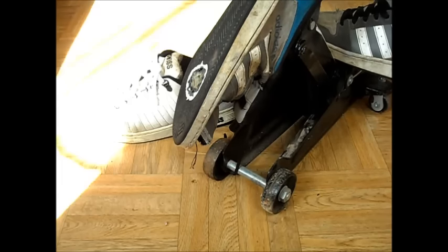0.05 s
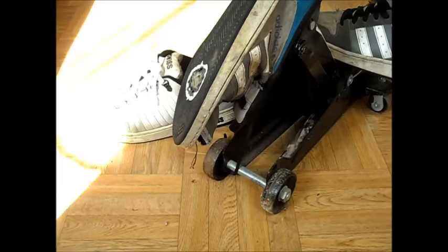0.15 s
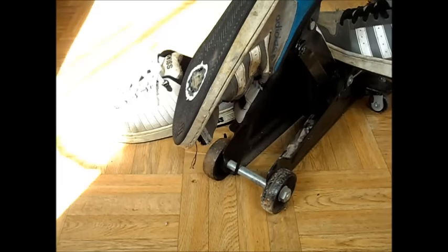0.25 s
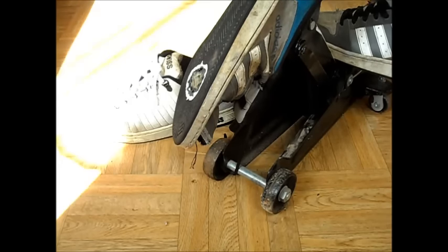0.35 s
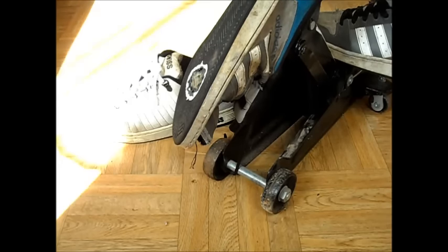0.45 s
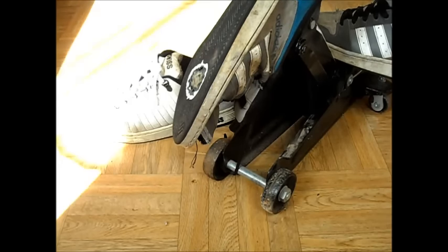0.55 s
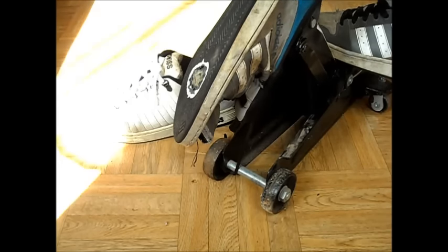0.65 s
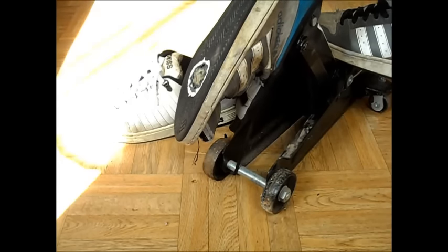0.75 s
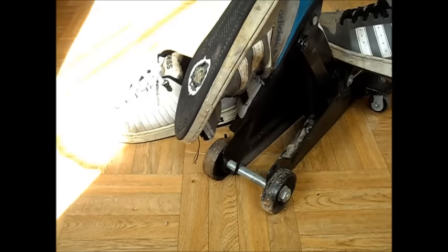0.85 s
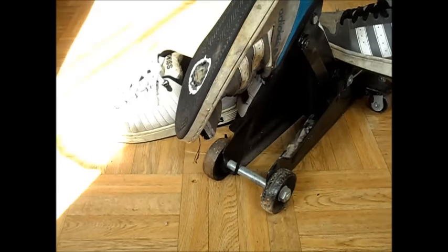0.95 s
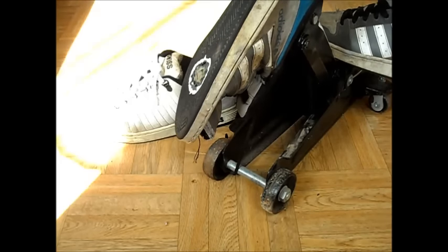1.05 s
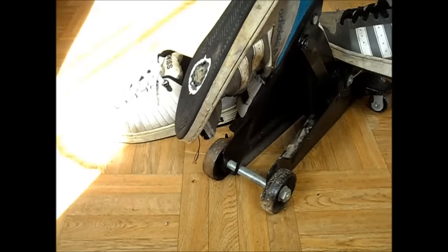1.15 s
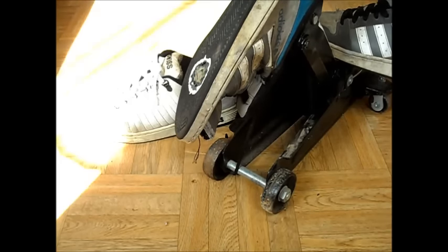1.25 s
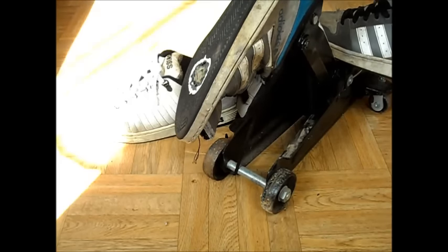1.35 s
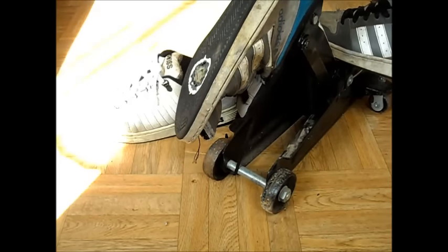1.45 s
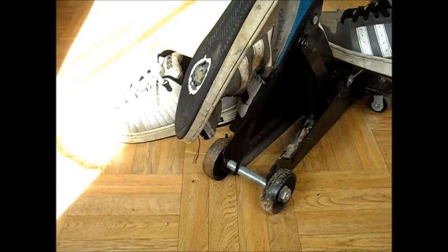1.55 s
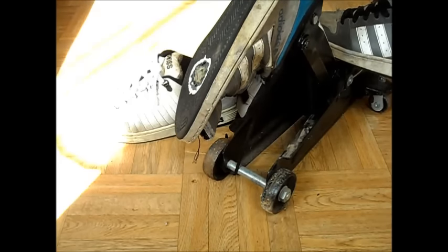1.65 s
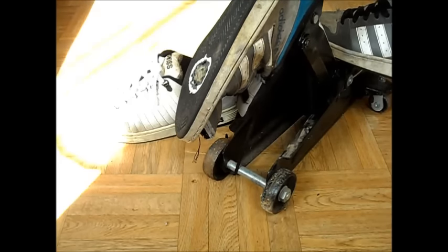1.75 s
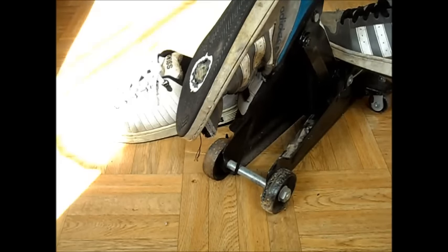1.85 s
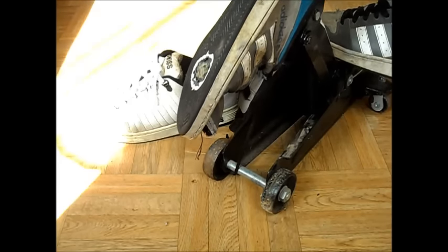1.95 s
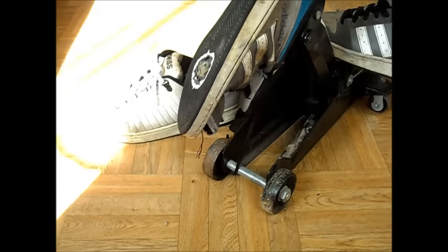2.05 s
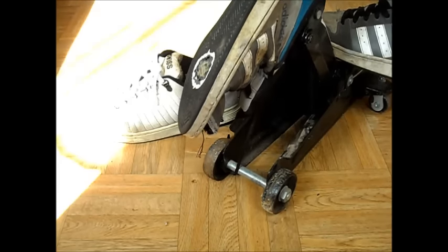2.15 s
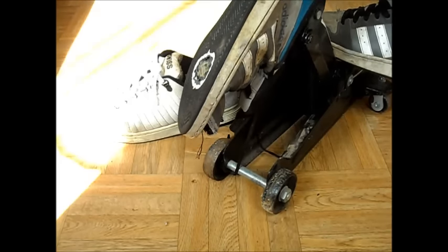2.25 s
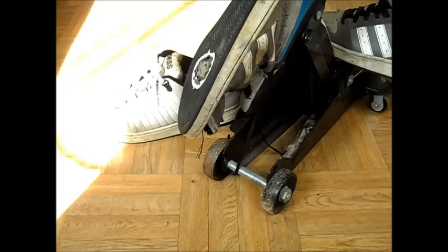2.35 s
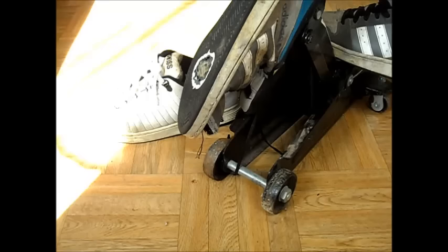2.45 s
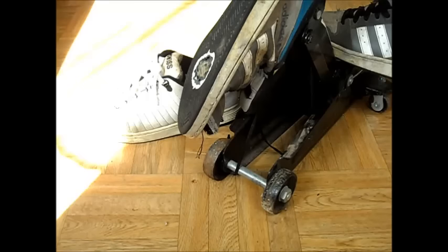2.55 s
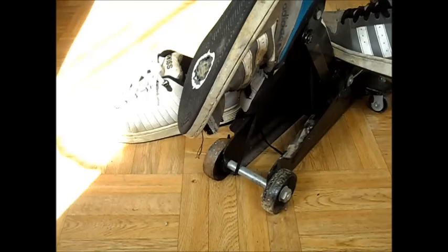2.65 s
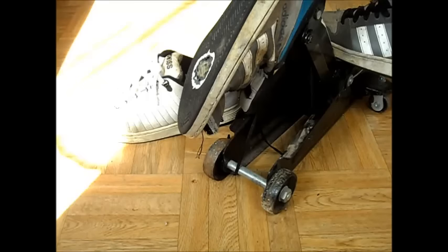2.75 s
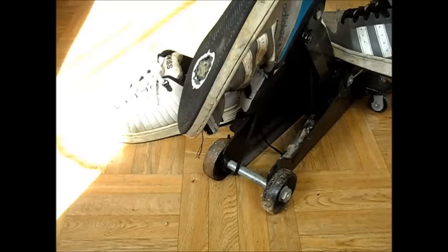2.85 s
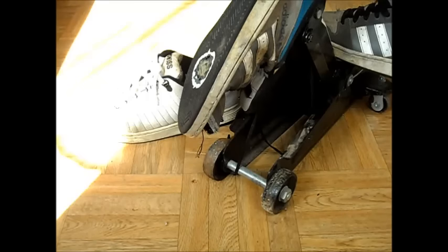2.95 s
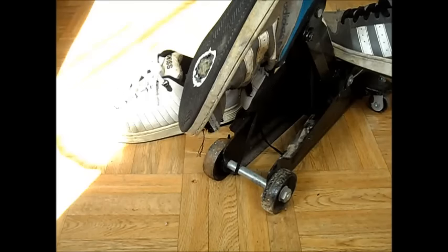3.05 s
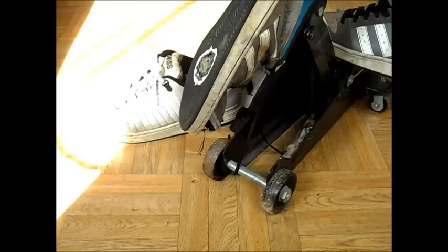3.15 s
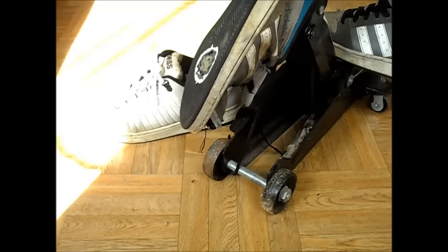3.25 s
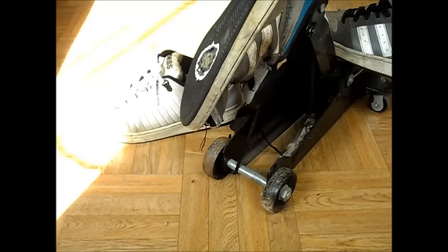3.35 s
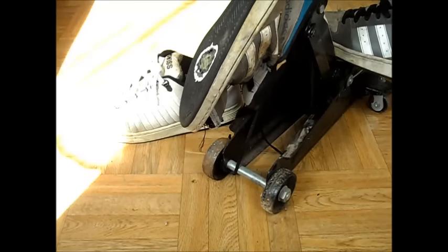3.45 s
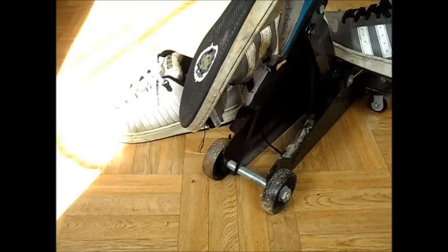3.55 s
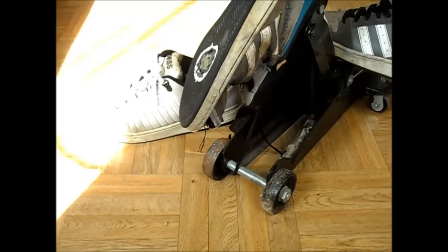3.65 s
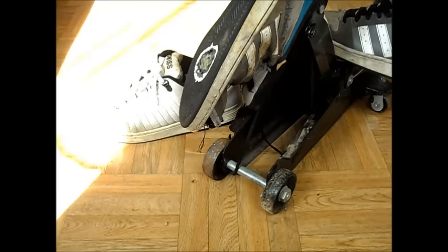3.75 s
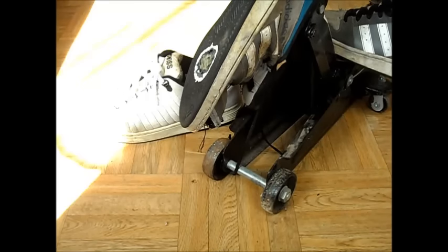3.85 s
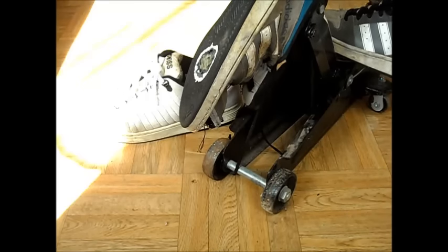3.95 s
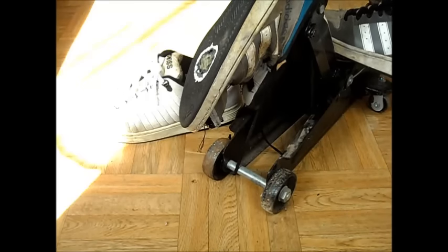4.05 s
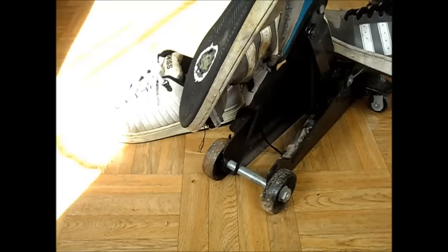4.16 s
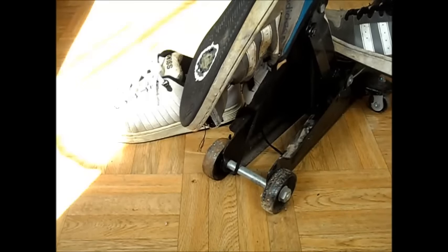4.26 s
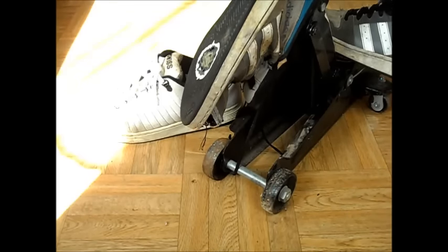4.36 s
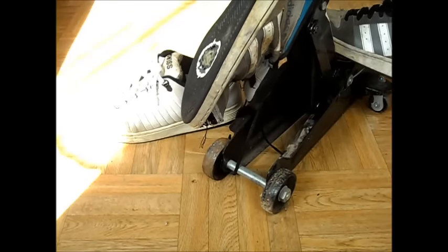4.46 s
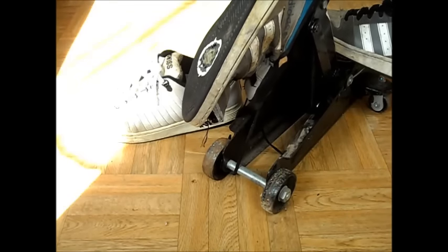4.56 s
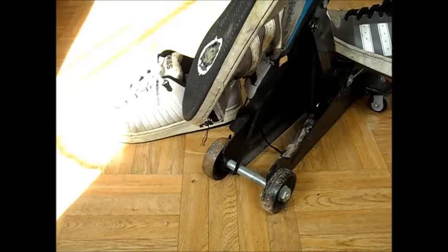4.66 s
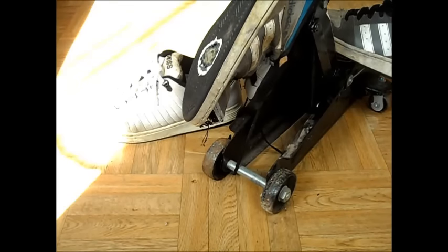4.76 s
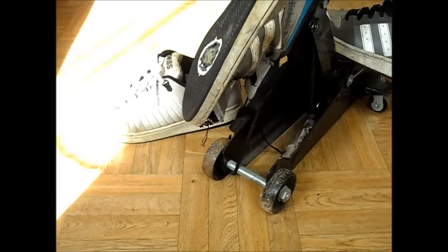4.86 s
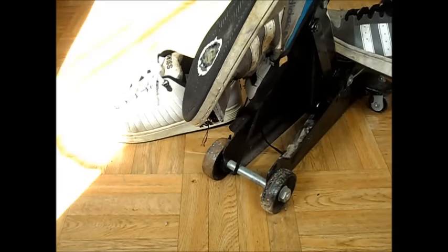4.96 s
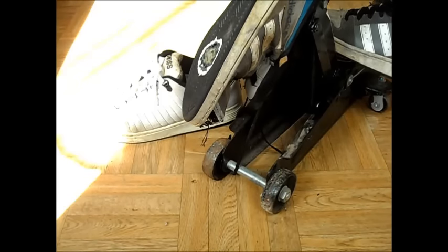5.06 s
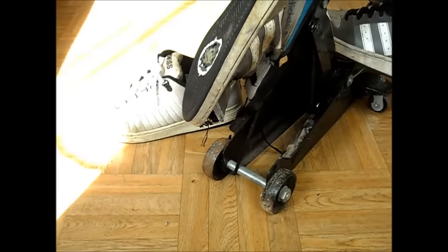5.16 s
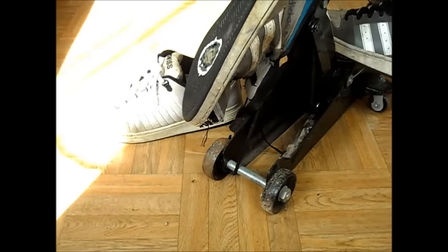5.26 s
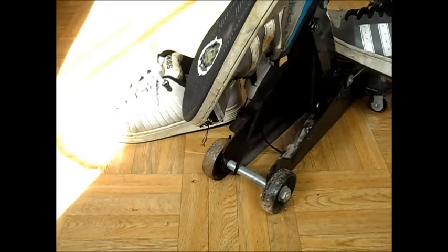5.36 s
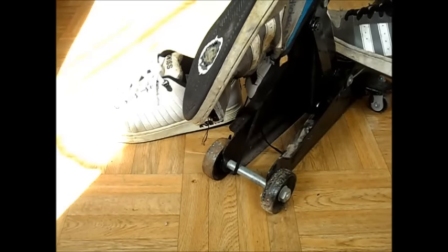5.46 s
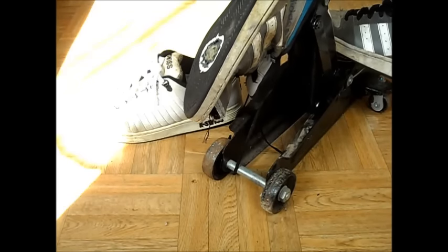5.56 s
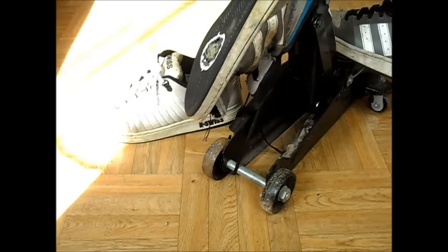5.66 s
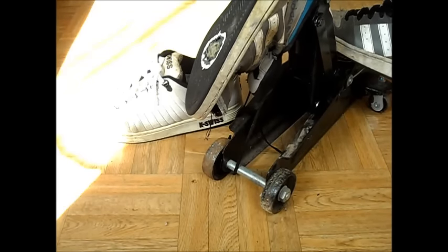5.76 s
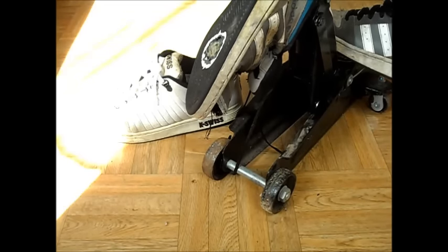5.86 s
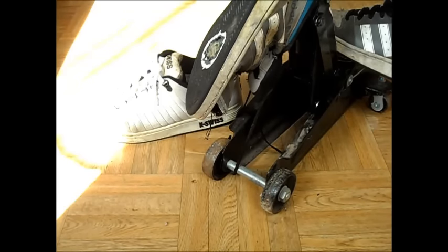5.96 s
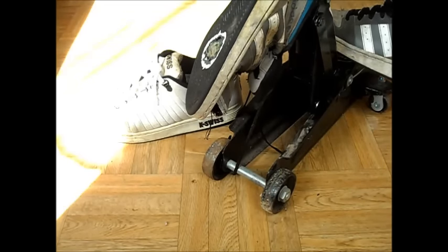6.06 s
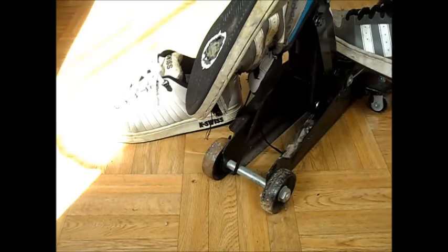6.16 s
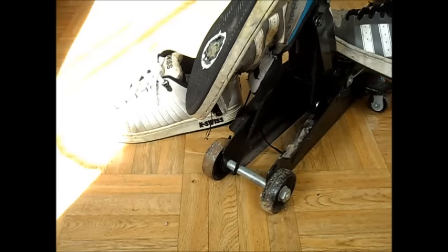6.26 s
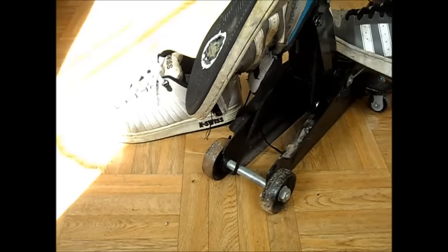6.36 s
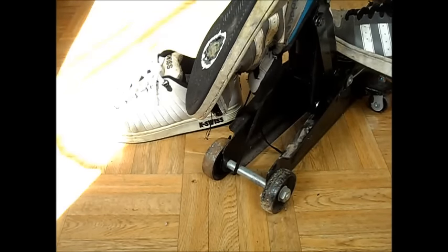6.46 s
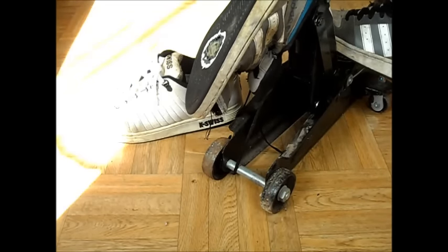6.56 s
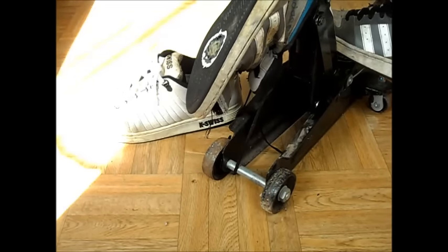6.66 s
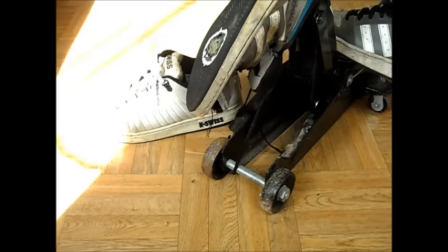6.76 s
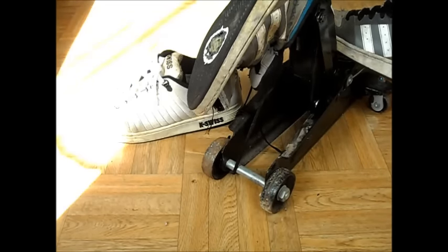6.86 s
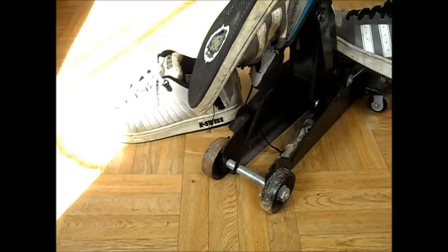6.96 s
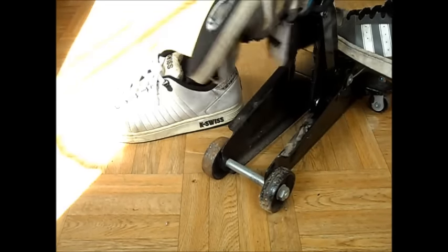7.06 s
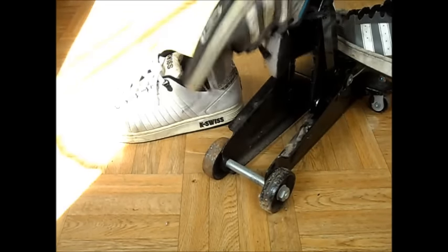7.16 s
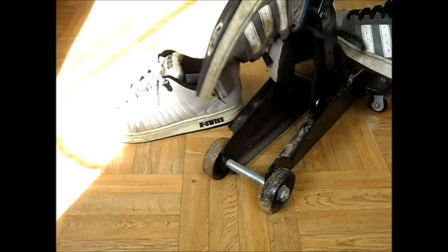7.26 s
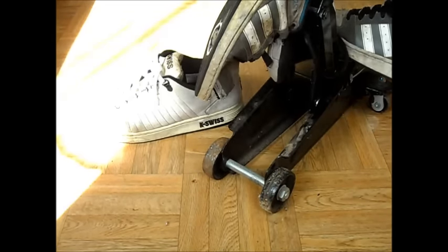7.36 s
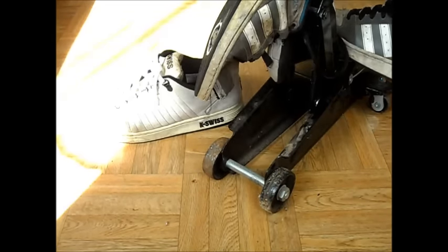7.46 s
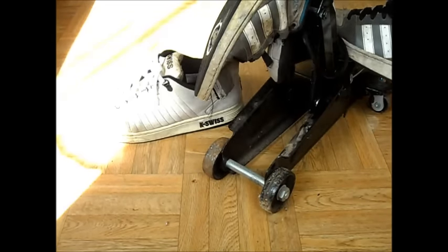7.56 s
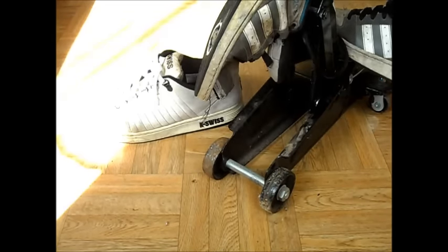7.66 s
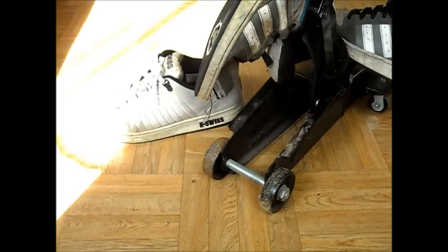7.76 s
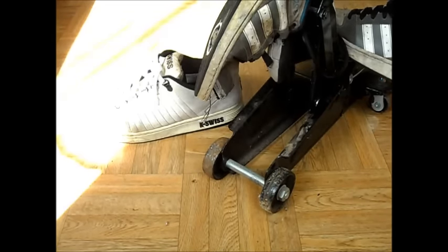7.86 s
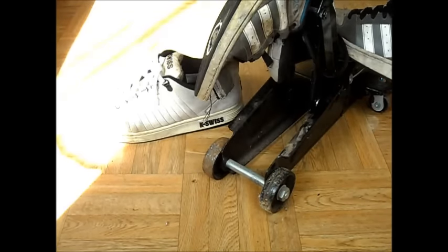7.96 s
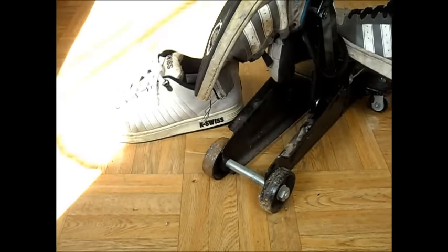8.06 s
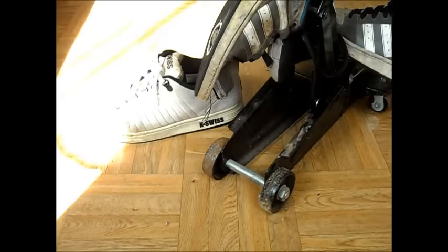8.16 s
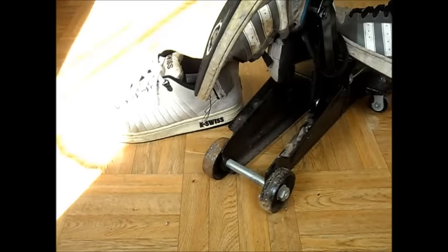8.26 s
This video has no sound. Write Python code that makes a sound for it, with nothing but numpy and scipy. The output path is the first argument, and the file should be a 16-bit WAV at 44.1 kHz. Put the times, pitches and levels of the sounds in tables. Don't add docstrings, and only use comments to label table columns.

```python
import sys
import numpy as np
from scipy import signal
from scipy.fft import rfft, irfft
from scipy.io import wavfile
from scipy.ndimage import uniform_filter1d

SR = 44100
rng = np.random.default_rng(int(sys.argv[2]) if len(sys.argv) > 2 else 0)


def invert_db(level):
    return 10 ** (np.asarray(level, dtype=float) / 20)


def int16_out(signal):
    q = np.round(np.clip(np.atleast_2d(signal).T, -1, 1) * 32767)
    wavfile.write(sys.argv[1], SR, q.astype(np.int16))


N = 366010

# pitch_hz, level_db [dB per Hz]
HISS_SPECTRUM = [(25, -2.5), (81, -1.5), (127, 0.5), (196, -8), (490, -9.5), (1620, -15.5), (9600, -22),
                 (10900, -30.5)]
HISS_LEVEL_DB = -61.5
# pitch_hz, decay_s [to -60 dB]
ROOM_DECAY = [(60, 0.97), (250, 0.27), (1000, 0.48), (3000, 0.53), (6000, 0.41), (10000, 0.4)]
# pitch_hz, level_db
CASING_COLOUR = [(200, -2.5), (700, 0.06), (1200, 1), (2000, 6), (3200, 3.5), (5000, 3.5), (7500, 5.5),
                 (10000, -2.5)]

# pitch_hz, level_db, decay_s [to -60 dB]
BOARD_MODES = [(75.5, 0, .4), (103, 0, .4), (146, 0, .3), (188, -3, .25)]
FRAME_MODES = [(253.5, 1, 0.13), (267.8, -20, 0.034), (314.9, 4.5, 0.16), (329, -6.5, 0.047),
               (373.3, 7.5, 0.15), (432.3, 5.5, 0.11), (455.5, -11, 0.021), (535.3, -6.5, 0.22),
               (636, 0, 0.082), (776, -7, 0.014)]
STEEL_MODES = [(850, -1.5, 0.011), (1083, -1.5, 0.018), (1201, -1, 0.027), (1328, -4.5, 0.026),
               (1500, -8, 0.012), (1798, -3, .008), (2000, -1, .012), (2254, -1, 0.011),
               (2500, -4.5, 0.0076), (2900, -8, 0.011), (3300, -11, 0.0027)]
PIN_MODES = [(3700, -2, .003), (4300, -2, .003), (4900, -3, .003), (5450, -3, .007), (6100, -2, .004),
             (6900, -3, .0025), (7800, -4, .004), (8900, -6, .002)]

# start_s, level_db, pitch_hz [favoured by the
FLOOR_PUSHES = [(.566, -37, 77), (1.054, -32, 86.5), (1.153, -40.5, 92), (1.746, -37, 109),
                (1.777, -31.5, 89.5), (1.78, -35.5, 147), (2.205, -30, 90), (2.296, -36.5, 90),
                (3.460, -28.5, 78), (3.55, -41, 71), (3.660, -36, 110), (3.738, -38, 84), (3.809, -41, 94),
                (4.276, -30.5, 96), (4.747, -38, 89), (4.789, -36.5, 81.5), (4.994, -46, 157),
                (5.294, -38.5, 97), (5.439, -41.5, 120), (5.988, -39, 72), (6.581, -36.5, 117),
                (7.041, -18.5, 86), (7.071, -11.5, 90),
                (0.023, -44.5, 103), (.13, -49, 108), (0.247, -47, 82.5), (.436, -45.5, 124),
                (.62, -44.5, 150), (.798, -54, 149), (1.312, -41, 90), (1.377, -45.5, 110),
                (2.472, -47.5, 80.6), (2.826, -43.5, 89), (2.964, -37, 78), (3.049, -58, 70),
                (3.376, -43, 129), (4.168, -46, 106), (5.171, -50, 110), (6.169, -58, 100),
                (6.341, -44, 90), (6.494, -41.5, 103), (6.718, -51, 148), (7.751, -50, 108),
                (8.15, -58.5, 72), (2.68, -55, 80), (5.551, -56, 78)]
SPOT_DB = 74.5

# start_s, pitch_hz, level_db, decay_s, rise_per_s [pitch factor]
PINGS_LEFT = [(.573, 1333, -44.5, 0.27, .007), (1.345, 1450, -52, 0.39, 0.107),
              (1.345, 2900, -60.5, 0.63, .1), (1.39, 1830, -57, .2, 0.011), (1.777, 5400, -47, 0.094, .059),
              (1.881, 144.5, -47.5, 1.2, .038), (2.31, 5200, -54, 0.27, 0.038), (3.061, 144, -62, 0.54, 0),
              (3.548, 4300, -54, 0.1, .015), (3.638, 6160, -52.5, 0.12, 0.11),
              (6.220, 1990, -62, 0.55, 0.12), (7.045, 47.66, -33, 2, 0.013),
              (7.044, 241.4, -31.5, 0.8, .017), (7.047, 5650, -35.5, .25, 0),
              (7.052, 5270, -40.5, .28, 0.012), (7.055, 7950, -44.5, 0.1475, 0),
              (7.297, 6000, -45, 0.023, 0.069), (5.015, 200.5, -42.5, 0.24, 0.056)]
# start_s, pitch_hz, level_db, decay_s
STEADY_PINGS = [(.569, 390, -28.5, 0.11), (.593, 370, -30.5, .13), (1.79, 570, -47, .25),
                (2.25, 200, -42.5, 0.21), (4.2, 156, -42.5, .3), (4.29, 1060, -46.5, 0.21),
                (5.445, 2150, -50.5, 0.18), (6.6, 640, -39.5, 0.23), (5.444, 1400, -45, 0.19),
                (2.29, 1350, -51, .25), (7.043, 195, -30, 0.37), (5.195, 400, -43, .15),
                (7.06, 5480, -44, .45), (4.866, 385, -37, .15), (6.494, 420, -46.5, .3),
                (6.003, 4250, -50, .08), (6.018, 5900, -49, 0.074)]

# start_s, hold_s, effort_db
ARM_STROKES = [(0, 0.19, -54), (.5, 0.087, -62), (1.157, 0.17, -50.5), (1.746, 0.078, -47.5),
               (2.2, 0.29, -54), (2.965, 0.013, -46), (3.546, 0.27, -52), (4.287, 0.032, -59),
               (4.88, 0.13, -50.5), (5.25, 0.19, -56), (6.035, 0.15, -51.5), (6.545, 0.067, -48),
               (7.15, .08, -57), (7.406, 0.35, -67.5)]
RISE_DB_S, FALL_DB_S, DRAG_FRAME_DB, DRAG_FLOOR_DB = 146, 94, -3, 1

# start_s, steel_db, frame_db, chatter_s
SLACK_TAKEN = [(.44, -46.5, -41, 0.014), (1.031, -48, -40, 0.007), (1.683, -46, -48, .014),
               (1.718, -42, -43, 0.021), (2.134, -41, -38.5, 0.013), (2.829, -48.5, -45, 0.01),
               (3.377, -43.5, -38.5, .025), (4.175, -43.5, -41.5, 0.016), (4.722, -41, -40.5, 0.0087),
               (5.175, -51, -41, .012), (5.969, -49, -38.5, 0.01), (6.492, -47, -39, 0.026)]
# start_s, steel_db, frame_db
LOOSE_RATTLES = [(.226, -53.5, -48.5), (.595, -48, -44), (.648, -52, -56), (1.063, -49, -49),
                 (1.241, -40, -68), (1.345, -49, -52), (1.631, -49, -55.5), (2.21, -68, -34),
                 (2.315, -38, -56), (3.017, -51, -56), (3.467, -51, -36.5), (3.678, -47.5, -46),
                 (3.866, -49, -47.5), (4.160, -49.5, -40.5), (4.217, -49, -38.5), (4.308, -61, -50),
                 (4.712, -60, -42), (5.018, -48, -47), (5.193, -48, -42), (5.269, -55, -77),
                 (6.309, -48, -42.5), (6.62, -49, -31.5), (7.749, -53.5, -52), (0.139, -54, -47.5),
                 (1.44, -53.5, -58)]
# start_s, steel_db, frame_db, pin_db
LEVER_STOPS = [(0.566, -51, -38, -66), (.574, -33.5, -31.5, -68), (1.148, -39, -31, -47.5),
               (1.169, -39.5, -49, -47), (1.768, -32.5, -42, -46), (1.779, -28, -27.5, -38.5),
               (1.789, -34.5, -31.5, -61), (2.958, -43.5, -30, -46.5), (2.971, -32, -56, -70),
               (3.578, -40, -47.5, -54), (3.639, -49, -49, -44), (4.272, -33.5, -29.5, -49.5),
               (4.285, -34, -36.5, -47.5), (4.865, -34, -41, -75), (5.297, -38.5, -37.5, -41.5),
               (5.328, -40.5, -35.5, -72), (5.419, -44, -34, -65), (5.443, -35.5, -36.5, -63),
               (6.598, -37.5, -55, -57)]
# start_s, steel_db, frame_db, pin_db
JOINT_GRINDS = [(2.286, -39.5, -41, -48), (3.543, -41.5, -43.5, -55), (4.828, -46, -41, -60),
                (4.847, -43.5, -37, -42), (5.992, -35.5, -39, -41), (6.573, -40.5, -30, -60)]
# start_s, steel_db, frame_db, pin_db
PART_SNAPS = [(0.539, -51, -44.5, -70), (1.82, -52, -55, -57), (2.296, -37, -37.5, -38),
              (2.946, -53, -46, -62), (3.720, -41.5, -41, -47), (4.93, -62, -63, -47.5),
              (6.016, -35.5, -35.5, -50), (6.874, -55, -67.5, -49.5), (6.903, -53.5, -72, -36),
              (6.988, -48.5, -52, -54)]
# start_s, steel_db, frame_db, pin_db, bright_hz [brightest steel]
JACK_CRASH = [
    (7.0413, -27.5, -20.5, -23, 797),
    (7.054, -25.5, -26.5, -24, 2500),
    (7.062, -26.5, -22, -36, 900),
    (7.076, -21, -20, -27, 2900),
]
DULL_HZ, BRIGHT_HZ = 1260, 2220
STOP_S, GRIND_S, SNAP_S, RATTLE_S, CRASH_S = 0.0099, 0.025, 0.009, 0.0062, 0.02
QUIET_PIN_DB = -18

# start_s, peak [full scale 1], push_s
CRACK_PUSHES = [
    (7.0405, 0.12, 0.000031),
    (7.0407, 0.4, 0.00022),
    (7.0447, 0.09, 0.00052),
    (7.0462, 0.059, .00025),
    (7.0501, -0.1, 0.00041),
    (7.0576, 0.069, 0.00058),
    (7.0653, .1, 0.0002),
    (7.068, 0.011, 0.00013),
]


def evened(x):
    return x / np.sqrt(np.mean(x ** 2) + 1e-20)


def read(points, hz):
    point_hz, value = np.transpose(points)
    return np.interp(np.log(hz + 1), np.log(point_hz + 1), value)


def add(mix, start_s, sound):
    part = mix[round(start_s * SR):][:len(sound)]
    part += sound[:len(part)]


def ring(modes, extra_db=0, seconds=0.37):
    hz, db, decay_s = np.array(modes).T[:, :, None]
    t = np.arange(round(seconds * SR)) / SR
    level = invert_db(db + np.reshape(extra_db, (-1, 1)) - 60 * t / decay_s)
    x = (level * np.sin(2 * np.pi * hz * t)).sum(0)
    return x / abs(x).max()


def hiss():
    hz = np.fft.rfftfreq(N, 1 / SR)
    spectrum = rfft(rng.standard_normal(N)) * invert_db(read(HISS_SPECTRUM, hz))
    return invert_db(HISS_LEVEL_DB) * evened(irfft(spectrum, N))


def boards():
    out = np.zeros(N)
    swell = 1 - np.exp(-np.arange(SR // 2) / SR / 0.014)
    rings = [ring([mode], 0, 0.5) * (-1) ** k * swell for k, mode in enumerate(BOARD_MODES)]
    for start_s, level_db, spot_hz in FLOOR_PUSHES:
        for mode, x in zip(BOARD_MODES, rings):
            off_spot_db = np.minimum(SPOT_DB * np.log(mode[0] / spot_hz) ** 2, 26)
            add(out, start_s, invert_db(level_db - off_spot_db) * x)
    return out


def pings():
    out, t = np.zeros(N), np.arange(SR) / SR
    onset = 1 - np.exp(-t / 0.0027)
    for start_s, hz, db, decay_s, rise in PINGS_LEFT + [(*row, 0) for row in STEADY_PINGS]:
        waver, flutter = uniform_filter1d(rng.standard_normal((2, len(t))), 200)
        pitch_hz = hz * (1 + abs(rise) * t + 0.02 * evened(waver))
        tone = np.sin(2 * np.pi * np.cumsum(pitch_hz) / SR)
        tone *= 1 + 0.8 * (hz > 480) * evened(flutter)
        add(out, start_s, invert_db(db - 60 * t / decay_s) * tone * onset)
    return out


def drag():
    t, effort = np.arange(N) / SR, np.zeros(N)
    for start_s, hold_s, effort_db in ARM_STROKES:
        rise_db = RISE_DB_S * np.maximum(start_s - t, 0)
        fall_db = FALL_DB_S * np.maximum(t - start_s - hold_s, 0)
        effort += invert_db(effort_db - rise_db - fall_db)
    slips = rng.standard_normal(N) * (rng.random(N) < 900 / SR)
    body = np.convolve(ring(FRAME_MODES) + 0.62 * ring(STEEL_MODES), np.hanning(16))
    frame = signal.oaconvolve(slips, body)[:N]
    floor = signal.oaconvolve(slips, ring(BOARD_MODES))[:N]
    return effort * (invert_db(DRAG_FRAME_DB) * evened(frame) + invert_db(DRAG_FLOOR_DB) * evened(floor))


def knock(rows):
    out, t = np.zeros(N), np.arange(3000) / SR
    steel_hz = np.array(STEEL_MODES)[:, 0]
    for start_s, steel_db, frame_db, pin_db, bright_hz, chatter_s in rows:
        place, contact = rng.standard_normal((6, 15)), rng.standard_normal((2, 3000))
        touch = contact[0] * (contact[1] > 1.3)
        touch *= np.exp(-t / max(chatter_s, 1e-4)) * (1 - np.exp(-t / 0.0013))
        touch[0] = 1.0
        near_db = 8.0 * np.exp(-(np.log(steel_hz / bright_hz) / 0.55) ** 2)
        parts = ((STEEL_MODES, steel_db, 14), (FRAME_MODES, frame_db, 40), (PIN_MODES, pin_db, 5))
        for k, (modes, level_db, touch_samples) in enumerate(parts):
            loaded = np.array(modes)
            loaded[:, 0] *= 1 + 0.025 * place[k + 3, :len(modes)]
            spot_db = 2.6 * place[k, :len(steel_hz)] + near_db * (k == 0)
            body = np.convolve(ring(loaded, spot_db[:len(modes)], 0.1), np.hanning(touch_samples))
            x = signal.fftconvolve(touch, body)
            add(out, start_s, invert_db(level_db) * x / abs(x).max())
    return out


def clanks():
    rows = [(*row, DULL_HZ, STOP_S) for row in LEVER_STOPS]
    rows += [(*row, DULL_HZ, GRIND_S) for row in JOINT_GRINDS]
    rows += [(*row, BRIGHT_HZ, SNAP_S) for row in PART_SNAPS]
    rows += [(*row, CRASH_S) for row in JACK_CRASH]
    slack = list(SLACK_TAKEN) + [(*row, RATTLE_S) for row in LOOSE_RATTLES]
    for start_s, steel_db, frame_db, chatter_s in slack:
        rows.append((start_s, steel_db, frame_db, steel_db + QUIET_PIN_DB, DULL_HZ, chatter_s))
    return knock(rows)


def crack():
    out, t = np.zeros(N), np.arange(600) / SR
    for start_s, peak, push_s in CRACK_PUSHES:
        u = t / push_s
        add(out, start_s, 1.64 * peak * np.sin(1.6 * u ** 0.68) * np.exp(-(u / 5.84) ** 3))
    rubber = invert_db(-38) * rng.standard_normal(240)
    add(out, CRACK_PUSHES[0][0] - 0.0055, rubber)
    return out


def room(x):
    out, at = np.zeros(N), np.arange(120, SR // 2 - 20, 20)
    for k in range(3):
        taps = np.zeros(SR // 2)
        taps[at + rng.integers(0, 20, len(at))] = rng.choice([-1., 1.], len(at))
        hz, t, z = signal.stft(taps, SR, nperseg=256)
        decay = invert_db(-60 * t / read(ROOM_DECAY, hz)[:, None])
        tail = signal.istft(z * decay, SR, nperseg=256)[1]
        share = np.sqrt(2 / 3) * np.cos(2 * np.pi * (23 * np.arange(N) / SR + k / 3))
        out += signal.fftconvolve(x * share, tail / np.linalg.norm(tail))[:N]
    return out


def through_casing(x):
    grid = np.linspace(0, 1, 128)
    gain = invert_db(2 * read(CASING_COLOUR, grid * SR / 2))
    return signal.oaconvolve(x, signal.minimum_phase(signal.firwin2(255, grid, gain)))[:N]


def scene():
    knocks, slip = clanks(), crack()
    wet = room(invert_db(-2.0) * knocks + invert_db(1.0) * slip)
    near = invert_db(-1.0) * knocks + slip + wet + drag()
    return (through_casing(near) + pings() + boards() + hiss())[None]


def roll_off(x):
    return signal.sosfilt(signal.butter(12, 11370, fs=SR, output="sos"), x)


def record(dry):
    thin = signal.sosfilt(signal.butter(3, 48, "high", fs=SR, output="sos"), dry)
    t = np.arange(N) / SR - CRACK_PUSHES[1][0]
    cut_db = (t > 0) * (1 - np.exp(-np.abs(t) / 0.039)) * (11.0 - 1.9 * t)
    edge = signal.firwin(201, 10800, window=("kaiser", 8), fs=SR)
    finished = signal.oaconvolve(thin * invert_db(-cut_db), edge[None], "same")
    return roll_off(finished)


dry = scene()
out = record(dry)
int16_out(out)
```